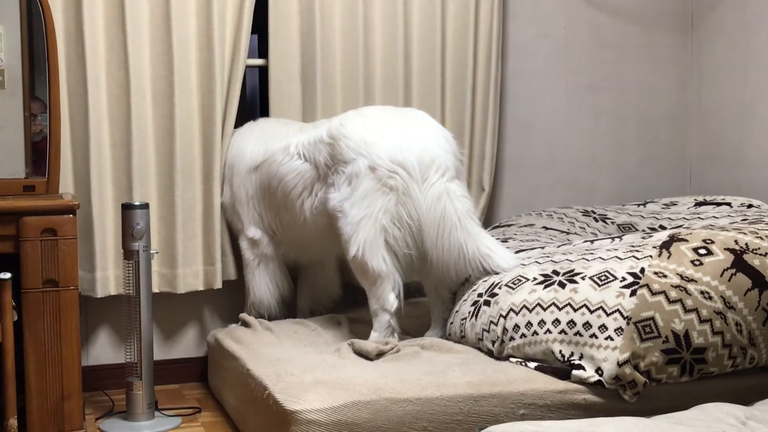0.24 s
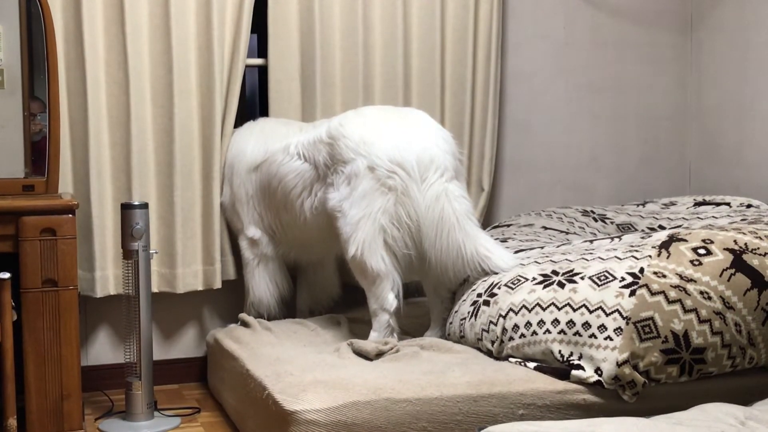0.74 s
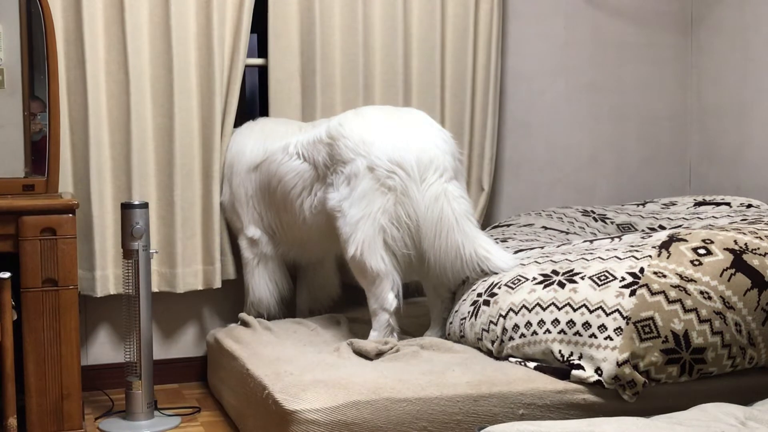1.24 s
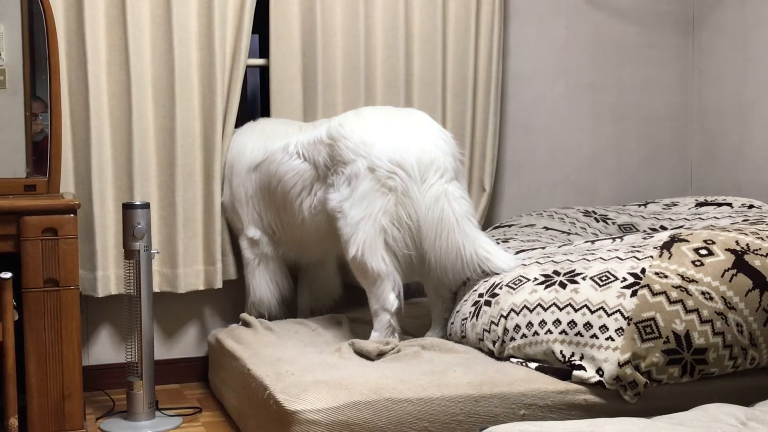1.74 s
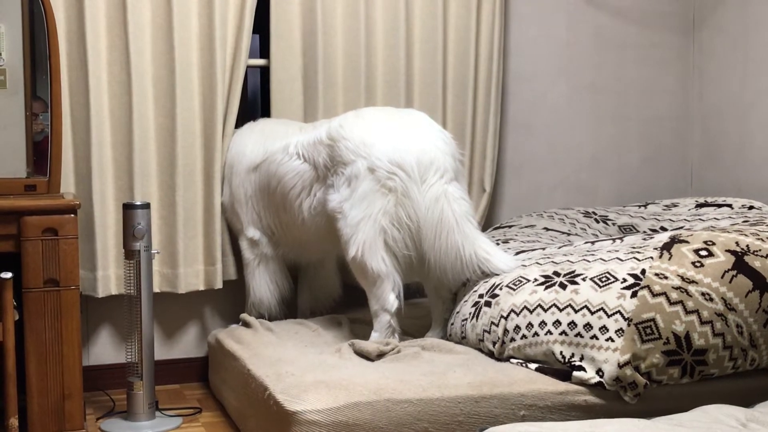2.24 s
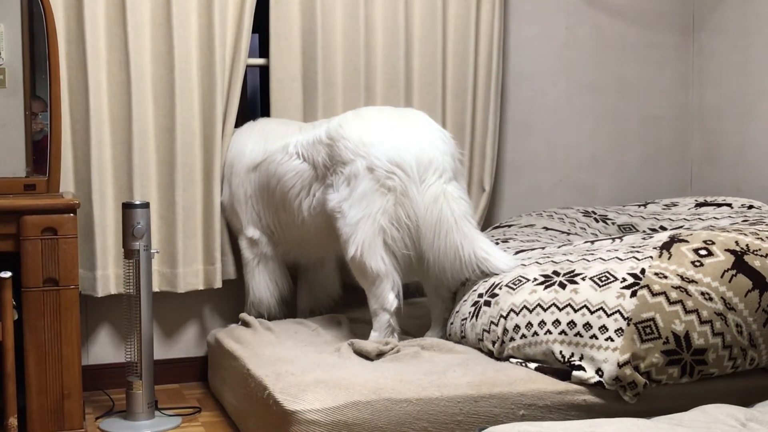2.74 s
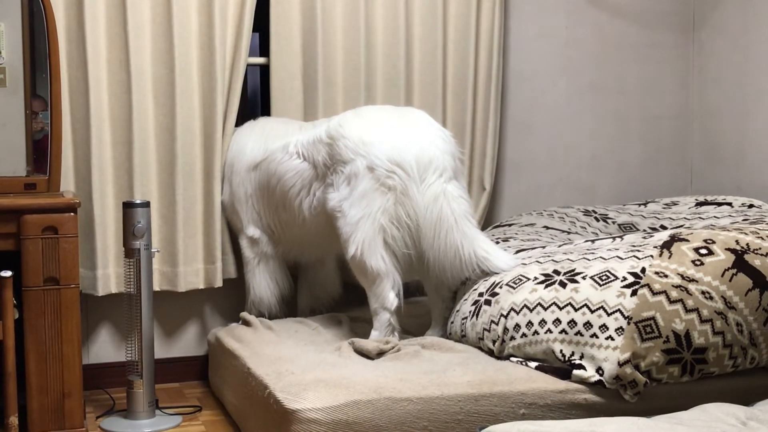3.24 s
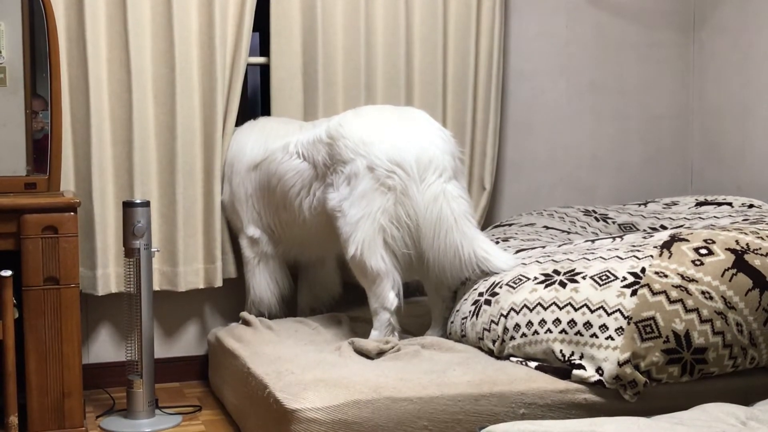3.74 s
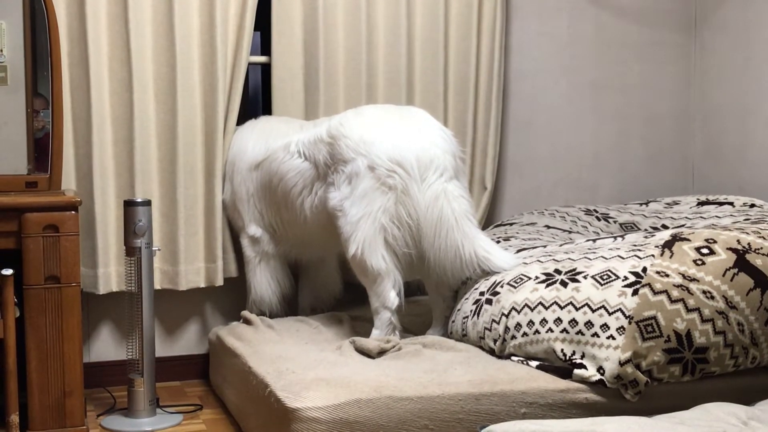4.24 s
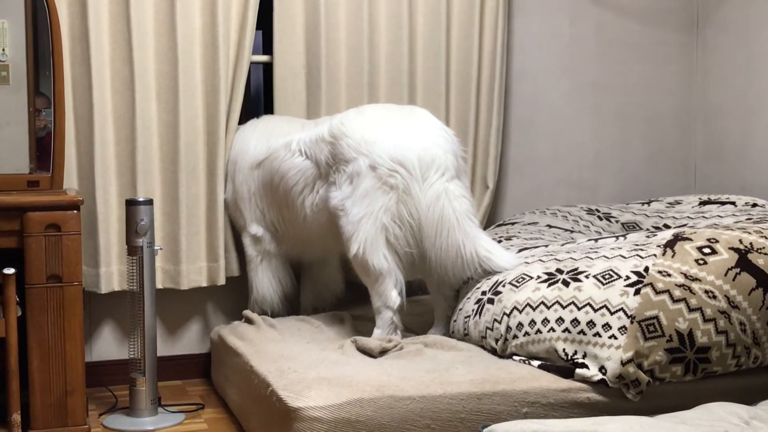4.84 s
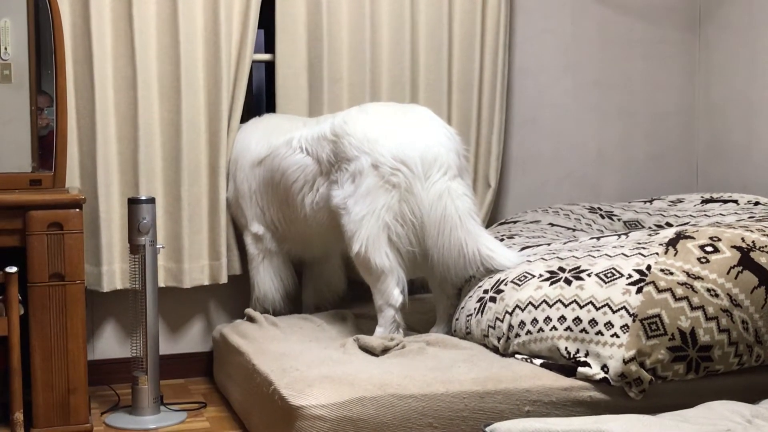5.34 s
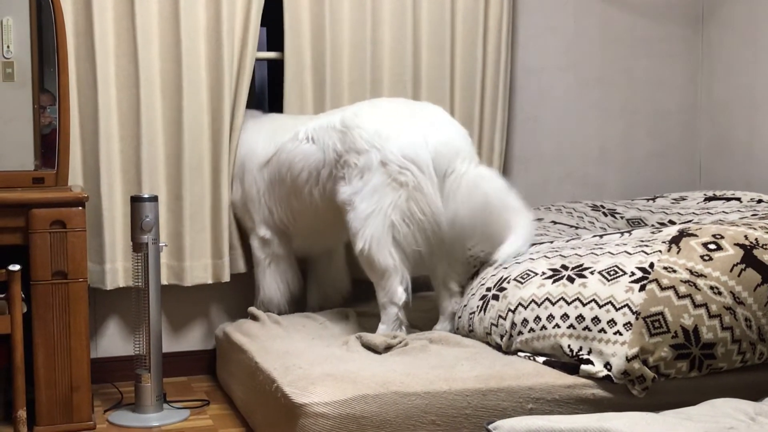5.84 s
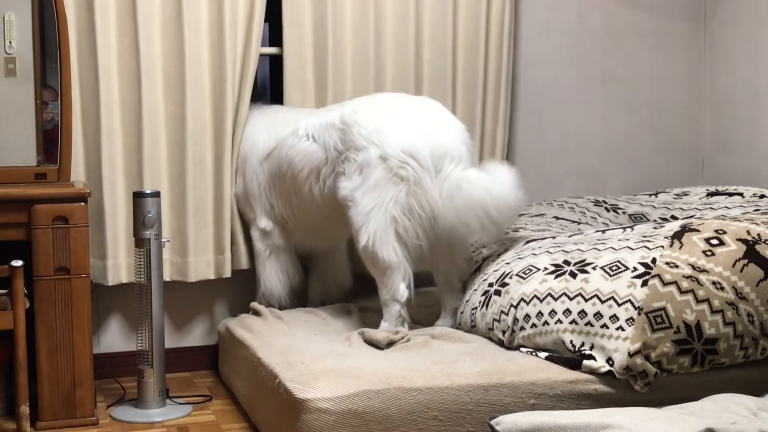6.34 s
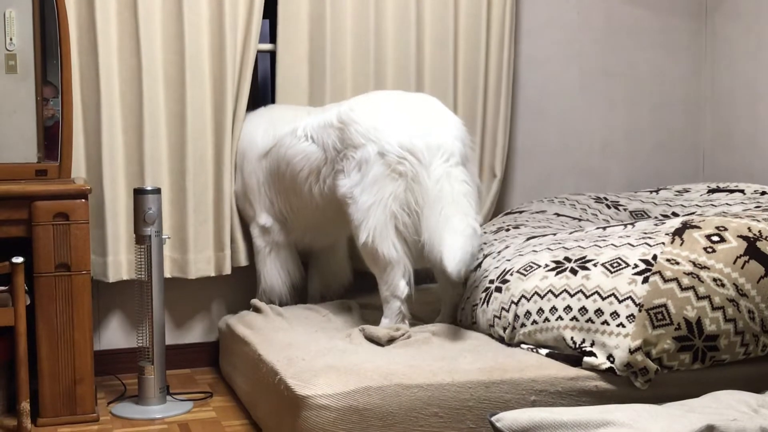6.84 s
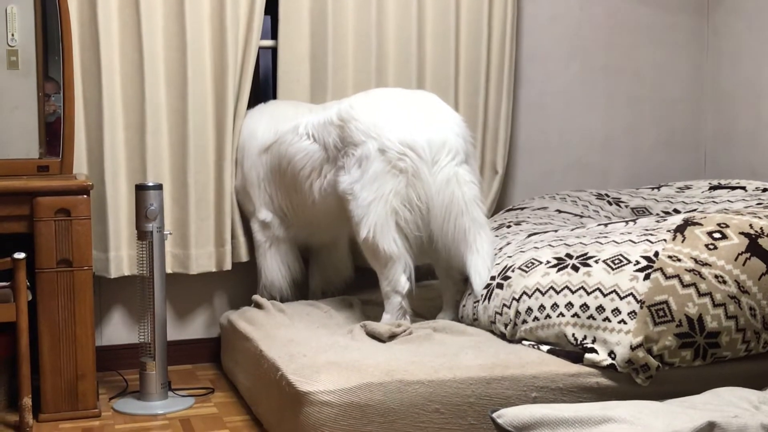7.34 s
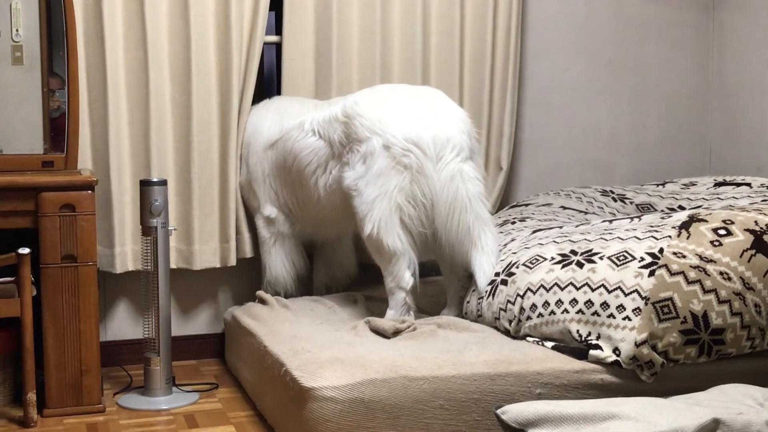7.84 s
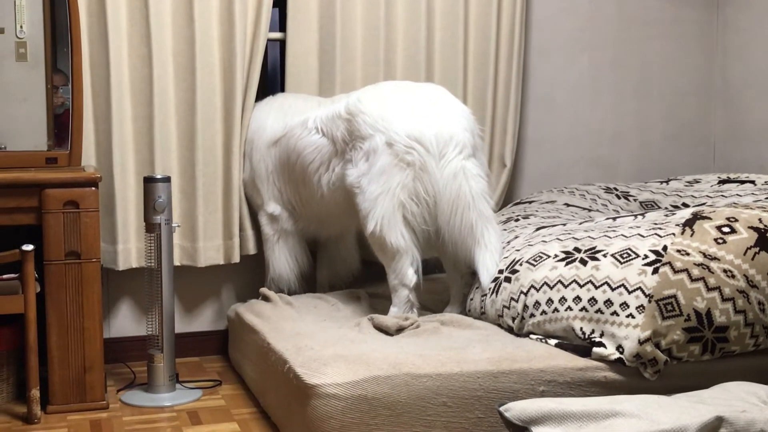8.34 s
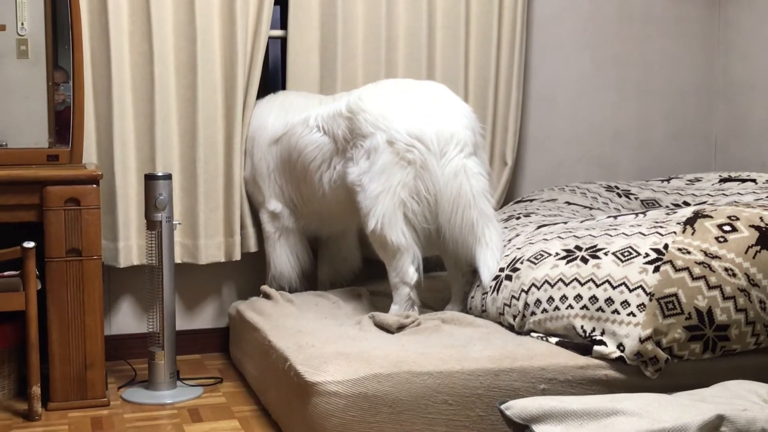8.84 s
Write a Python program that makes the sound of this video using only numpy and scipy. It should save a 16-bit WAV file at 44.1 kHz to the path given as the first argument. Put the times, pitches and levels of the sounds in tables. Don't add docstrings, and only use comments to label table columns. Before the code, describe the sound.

A big dog growls low in a bedroom and gives two loud deep barks while a second dog answers faintly from elsewhere in the house.

```python
import sys
import numpy as np
from scipy import signal
from scipy.fft import rfft, irfft, next_fast_len
from scipy.io import wavfile
from scipy.ndimage import uniform_filter1d, map_coordinates

SR = 44100
rng = np.random.default_rng(int(sys.argv[2]) if len(sys.argv) > 2 else 0)


def to_wav(s):
    ch = np.atleast_2d(s).T
    pcm = np.round(np.clip(ch, -1, 1) * 32767)
    wavfile.write(sys.argv[1], SR, pcm.astype(np.int16))


def decibels_to_gain(level_db):
    exponent = np.asarray(level_db, float) / 20
    return 10 ** exponent


N = 400869


def unit(x):
    return x / np.sqrt(np.mean(x ** 2) + 1e-20)


def steady(x):
    return x / np.sqrt(np.abs(uniform_filter1d(x ** 2, size=900)) + 1e-12)


def along(points, hz):
    f, v = np.transpose(points)
    return np.interp(np.log(hz + 1), np.log(f + 1), v)


def curves(rows):
    s, *cols = np.transpose(rows)
    return [np.interp(np.arange(N) / SR, s, c) for c in cols]


def wobble(rate):
    knots = rng.standard_normal(int(N * rate / SR) + 4)
    return map_coordinates(knots, [np.arange(N) * rate / SR])


def filtered(x, response):
    m = next_fast_len(N + SR // 2)
    return irfft(rfft(x, m) * response(np.fft.rfftfreq(m, 1 / SR)), m)[:N]


def noise(spectrum):
    return unit(filtered(rng.standard_normal(N), lambda hz: decibels_to_gain(along(spectrum, hz))))


def resonances(modes, f, order=2):
    return sum(decibels_to_gain(db) * (1j * f * w / (c * c - f * f + 1j * f * w)) ** order for c, w, db in modes)


# frequency in Hz, time to fall by 60 dB in seconds.
REVERB_TIME = [(100, 0.38), (400, 0.36), (1200, 0.26), (4000, 0.037), (12000, 0.092)]


def room(x, longer):
    hz, t, z = signal.stft(rng.standard_normal(SR // 2), SR, nperseg=256)
    t60 = longer * along(REVERB_TIME, hz)[:, None]
    tail = signal.istft(z * decibels_to_gain(-60 * t / t60), SR, nperseg=256)[1]
    return signal.fftconvolve(x, tail / np.linalg.norm(tail[:SR // 8]))[:N]


# start in seconds, length in seconds, level in dB.
RUMBLE_SWELLS = [(0, .1, -59), (.45, .5, -66), (1.29, .68, -54.5), (2.202, .35, -54), (5.14, .15, -57.5),
                 (5.62, .3, -60), (6.358, .1, -53), (7.007, .65, -58), (8.548, .6, -51)]
# frequency in Hz, density in dB per Hz.
RUMBLE_COLOUR = [(15, -30), (28, -13), (42, -3.5), (55, -6), (80, -33)]
SWELL_EDGE_DB_PER_S, STILL_DB = 116, -67.5


def rumble():
    t = np.arange(N) / SR
    swells = []
    for s, length, db in RUMBLE_SWELLS:
        outside = np.maximum(np.maximum(s - t, t - s - length), 0)
        swells.append(db - SWELL_EDGE_DB_PER_S * outside)
    level_db = np.max(swells, axis=0).clip(STILL_DB)
    return decibels_to_gain(level_db + 1.0) * noise(RUMBLE_COLOUR)


# frequency in Hz, density in dB per Hz.
HISS_COLOUR = [(760, -33), (1300, -10.5), (1800, -0.5), (2020, -3), (2970, -3.5), (3470, -6), (4060, -4.5),
               (4910, -7.5), (6860, -2.5), (7690, -6), (8810, -2), (10400, -8.5), (11400, -6), (14700, -10),
               (15800, -13)]


def hiss():
    return decibels_to_gain(5.0 + 0.59 * wobble(9)) * noise(HISS_COLOUR)


# frequency in Hz, density in dB per Hz.
FAN_AIR = [(26, -42), (45, 1.5), (64, -4.5), (150, -6), (176, -1.5), (236, -7.5), (270, -12), (367, -10.5),
           (478, -19), (641, -12), (846, -15), (980, -12), (1500, -16.5), (1950, -13), (3300, -120)]
# frequency in Hz, level in dB.
FAN_HUM = [(120, -62), (182, -61.5), (238, -61)]


def fan():
    t = np.arange(N) / SR
    out = decibels_to_gain(-0.5 + 0.2 * wobble(0.97)) * noise(FAN_AIR)
    for hz, db in FAN_HUM:
        level = decibels_to_gain(db + 51 + 2.4 * wobble(8.0))
        out = out + level * np.sin(2 * np.pi * hz * t + 2.3 * wobble(7.3))
    return out


# frequency in Hz, density in dB per Hz.
BEDDING_COLOUR = [(500, -42), (900, 5), (1150, 10), (1800, -12), (2500, -3), (3500, -35), (6000, -89)]


def bedding():
    return decibels_to_gain(-14 + 4.5 * wobble(4) + 2.5 * wobble(21)) * noise(BEDDING_COLOUR)


# start in seconds, sink, hold and recovery times in seconds, depth in dB.
GAIN_DUCKS = [
    (5.617, 0.097, 0.53, 0.066, -3),
    (6.62, 0.088, 0.022, 0.199, -1.5),
]
HISS_DB = -51.5


def background():
    t = np.arange(N) / SR
    level_db = HISS_DB
    for s, sink, hold, back, db in GAIN_DUCKS:
        level_db = level_db + np.interp(t, s + np.cumsum([0, sink, hold, back]), [0, db, db, 0])
    return decibels_to_gain(level_db) * (hiss() + fan() + bedding()) + rumble()


# time in seconds, length in seconds, centre in Hz,
# width in Hz, level in dB.
SOFT_MOVES = [(0.446, 0.2, 1130, 400, -56), (1.9, 0.11, 350, 300, -59), (7.424, 0.035, 2000, 1800, -45),
              (8.98, 0.09, 420, 300, -50.5), (1, 0.074, 1500, 1396, -53.5), (1.81, 0.08, 126, 50, -41.5),
              (1.814, 0.047, 790, 700, -51), (2.42, 0.17, 1500, 1580, -49.5), (5.045, 0.12, 119.2, 60, -48),
              (5.195, 0.058, 2100, 1000, -44), (6.916, 0.12, 1500, 1411, -51),
              (7.303, 0.0793, 197.2, 150.4, -53), (7.492, 0.058, 410, 150, -50.5),
              (7.57, 0.067, 490, 250, -47.5), (7.776, 0.1, 433, 244, -50), (8.23, .05, 1770, 700, -48),
              (8.32, .03, 2000, 1200, -48), (8.524, 0.039, 130.1, 149.7, -43),
              (8.788, 0.057, 2440, 802, -44), (8.857, 0.027, 201, 80, -36.5)]


def stirs():
    out, t = np.zeros(N), np.arange(N) / SR
    for s, length, hz, width, db in SOFT_MOVES:
        side = length * np.where(t < s, .5, 1.5)
        swell = np.exp(-(2 * (t - s) / side) ** 2) * decibels_to_gain(db)
        low = [(max(hz - 2 * width, 9), -40), (max(hz - width / 2, 30), 0)]
        high = [(hz + width / 2, 0), (hz + 2 * width, -30), (hz + 5 * width, -90)]
        out += swell * noise(low + high)
    return out


# time in seconds, peak in dB, crack over the peak in dB.
BLOWS = [(6.998, -17.5, -36), (7.003, -21.5, 1.5), (7.082, -25.5, -13), (7.092, -29, -6), (7.13, -28.5, -8),
         (7.161, -47, -8), (7.282, -34.5, 3.5), (7.366, -24.5, -1.5), (7.371, -28.5, -14), (7.38, -27, -25)]
# frequency in Hz, width in Hz, level in dB.
WOOD_RING = [(300, 170, -5), (570, 27, -10), (775, 130, -13), (874, 160, 5.5), (1040, 41, 6),
             (1070, 50, -12), (1500, 580, -25)]
# frequency in Hz, width in Hz, level in dB.
CRACK_RING = [(1500, 410, 11.5), (2520, 1050, 10), (3430, 2400, -2), (5200, 1800, -7), (7240, 2300, -22)]
# time in seconds, frequency in Hz, level in dB, time to fall by 60 dB in seconds.
BOARD_THUDS = [
    (7.013, 87, -26.5, 0.23),
    (7.115, 72.4, -27.5, 0.15),
    (7.381, 97.7, -20, 0.15),
]


def knocks():
    blows, cracks, boards = np.zeros(N + SR), np.zeros(N + SR), np.zeros(N + SR)
    t = np.arange(SR // 3) / SR
    for s, db, crack_db in BLOWS:
        here = slice(round(s * SR), round(s * SR) + len(t))
        blows[here] += rng.standard_normal(len(t)) * decibels_to_gain(db + 18.5 - 60 * t / 0.016)
        cracks[here] += rng.standard_normal(len(t)) * decibels_to_gain(db + crack_db - 2.5 - 60 * t / 0.056)
    for s, hz, db, t60 in BOARD_THUDS:
        late_start = 1 - np.exp(-t / 0.011)
        boards[round(s * SR):][:len(t)] += decibels_to_gain(db - 60 * t / t60) * np.sin(2 * np.pi * hz * t) * late_start
    wood = filtered(blows[:N], lambda f: resonances(WOOD_RING, f, order=1) / (1 + 1j * f / 1500) ** 3)
    hits = wood + filtered(cracks[:N], lambda f: resonances(CRACK_RING, f))
    return hits + boards[:N] + decibels_to_gain(-7.0) * room(hits, longer=0.72)


def sounding(calls):
    t = np.arange(N) / SR
    gates = [np.clip(np.minimum(t - c[0][0], c[-1][0] - t) / .012 + 1, 0, 1) for c in calls]
    return np.clip(sum(gates), 0, 1)


def breath(modes):
    air = rng.standard_normal(N)
    return steady(filtered(air, lambda f: resonances(modes, f) / (1 + 1j * f / 7000) ** 2))


def voice(calls, throat, jitter, scatter, airy, roll_db, hoarse_db, front_db):
    pitch, *levels = curves(np.vstack(calls))
    levels = uniform_filter1d(levels, size=800, axis=1)
    first_db, second_db, rough_db, boom_db, bright_db = levels
    turns = np.cumsum(pitch * (1 + jitter * wobble(60))) / SR
    clean = decibels_to_gain(first_db) * np.sin(2 * np.pi * turns)
    all_modes = sum(throat, [])
    for k in range(2, 8):
        lift = 1
        if k > 2:
            lift = np.repeat(np.abs(resonances(all_modes, k * pitch[::64])) + 0.11, 64)[:N]
        level = decibels_to_gain(second_db + roll_db * (k - 2.5) + 0.29 * wobble(40))
        clean = clean + lift * level * np.sin(2 * np.pi * k * turns + k)
    loose = turns / 2 + scatter * wobble(150)
    pulses = np.diff(np.floor(loose), prepend=0) * decibels_to_gain(5.8 * wobble(200))
    air = rng.standard_normal(N) * (4.2 + np.cos(2 * np.pi * loose))
    drive = unit(pulses / np.sqrt(pitch)) + airy * unit(air)

    def through(modes):
        return steady(filtered(drive, lambda f: resonances(modes, f) / (1 + 1j * f / 1700) ** 4))

    boom, mid, high = [through(modes) for modes in throat]
    hoarse = decibels_to_gain(rough_db + hoarse_db) * (decibels_to_gain(boom_db) * boom + mid) + decibels_to_gain(bright_db + front_db) * high
    return sounding(calls) * np.sqrt(2) * clean, sounding(calls) * hoarse


# start of full voice in seconds, time to the peak in seconds, pitch in Hz,
# level in dB, fundamental over it in dB.
FAR_BARKS = [
    (.666, 0.043, 343.7, -30, 0.5),
    (1.354, 0.065, 318.5, -28.5, -7),
    (2.671, 0.06, 330.3, -28.5, -9),
    (6.615, 0.0442, 354, -29, 11),
    (8.557, 0.051, 336.1, -28.5, -1),
]
COLD_START = (.45, .75)
COLD_DB = 72
SWELL_S, BODY_S, DIE_S = .05, 0.137, 0.1285
QUIET_DB, LEAD_DB, HOLD_DB = -34, -12, -9.5
SCOOP, SAG = 1.03, .05
THIN_DB_PER_S = 81
HUSK_DB, HUSK_LEAD_DB, FAR_BOOM_DB, FAR_FRONT_DB, FAR_JAWS_DB = -2.5, 7.5, 0.5, -7.5, -14
HUSK_SLOPE, OPEN_DB = 0.18, 3


def answers():
    shape = np.array([QUIET_DB, LEAD_DB, 0, HOLD_DB, QUIET_DB])
    opening = OPEN_DB * np.array([-1, -1, 1, 0, -1])
    calls = []
    for s, peak, hz, db, first_db in FAR_BARKS:
        t = np.array([-SWELL_S, 0, peak, BODY_S, BODY_S + DIE_S])
        husk = db + shape + HUSK_DB - HUSK_SLOPE * max(first_db, 0)
        husk = husk + HUSK_LEAD_DB * np.array([0, 1, 0, 1, 0])
        first = db + first_db + shape - THIN_DB_PER_S * np.clip(t - peak, 0, BODY_S)
        onset = (SCOOP, 1 + SAG) if calls else COLD_START
        bend = np.array([*onset, 1 - SAG / 2, 1, 1 - SAG])
        second = db + shape - COLD_DB * np.maximum(1 - SAG - bend, 0)
        front = husk + FAR_FRONT_DB + opening
        jaw = husk + FAR_JAWS_DB + 0.9 * opening
        calls.append(np.transpose([s + t, hz * bend, first, second, husk, FAR_BOOM_DB + 0 * t, front, jaw]))
    return calls


# frequency in Hz, width in Hz, level in dB.
FAR_THROAT = [
    [(341, 194, -8.5), (389, 40, -0.5)],
    [(520, 88, -17), (634, 32, -10), (671.7, 60, 4.5)],
    [(1037, 87, -8.5), (1152, 36, 1.5), (1194, 49, -6), (1410, 200, -15)],
]
# frequency in Hz, width in Hz, level in dB.
FAR_JAWS = [(1830, 150, -1), (1960, 170, 0)]


def far_dog():
    calls = answers()
    clean, hoarse = voice([c[:, :-1] for c in calls], FAR_THROAT, jitter=.008, scatter=.1, airy=.4,
                          roll_db=-5.5, hoarse_db=0, front_db=0)
    jaws_db = curves(np.vstack(calls))[-1]
    hoarse = hoarse + sounding(calls) * decibels_to_gain(jaws_db + 3.0) * breath(FAR_JAWS)
    echo = room(decibels_to_gain(-29) * clean + decibels_to_gain(-7.5) * hoarse, longer=0.74)
    return decibels_to_gain(-1.5) * clean + decibels_to_gain(-6.5) * hoarse + echo


# time in seconds, pitch in Hz, level in dB.
GROWLS = [
    [(2.45, 50.7, -56), (2.54, 54.5, -54), (2.646, 61.0, -48), (2.95, 59.1, -50), (3.118, 63.8, -47.5),
     (3.38, 64.9, -47.5), (3.644, 64.6, -49), (3.852, 67.2, -54.5), (3.95, 65.6, -63)],
    [(6.3, 78.67, -48), (6.394, 71.2, -46), (6.654, 68.8, -41), (6.718, 71.1, -44), (6.78, 61.3, -53)],
]
# frequency in Hz, level in dB.
CHEST = [(150, -9), (188, -6), (215, -18), (255, -23), (290, -5.5), (340, -22.5), (420, -27), (600, -48)]
GROWL_FIRST_DB, GROWL_STEADY, GROWL_MID_DB = -4.5, 0.18, -50


def growl():
    pitch, second_db = curves(np.vstack(GROWLS))
    first_db = second_db + GROWL_FIRST_DB - GROWL_STEADY * (second_db - GROWL_MID_DB)
    turns = np.cumsum(pitch * (1 + 0.01 * wobble(30))) / SR
    upper = 0
    for k in range(2, 8):
        level_db = along(CHEST, k * pitch) * (k > 2) + 1.9 * wobble(7.7)
        upper = upper + decibels_to_gain(level_db) * np.sin(2 * np.pi * k * turns + k)
    tone = decibels_to_gain(first_db) * np.sin(2 * np.pi * turns) + decibels_to_gain(second_db) * upper
    return sounding(GROWLS) * np.sqrt(2) * tone


# time in seconds, pitch in Hz, voiced level in dB,
# hoarse level in dB, mouth opening in dB.
BARK_TOPS = [
    [(5.495, 134.4, -65, -76, 0), (5.534, 288.2, -20.5, -19, -21), (5.565, 343.5, -15.5, -7.5, -10),
     (5.59, 378.6, -16.5, -19.5, -8), (5.62, 410.5, -5, -10, -0.5), (5.652, 416.9, -26.5, -9.5, -4),
     (5.678, 415.7, -20, -15.5, -2)],
    [(5.866, 134, -45, -43, 5), (5.9, 267.1, -24.5, -24, -5), (5.936, 410, -14.5, -9, -3.5),
     (5.972, 411, -6.5, -49, -9), (6.002, 411.7, -18.5, -7.5, -5.5), (6.055, 394.4, -22, -13, -2.5)],
]
# start in seconds, length in seconds,
# rest pitch in Hz, slide time in seconds, level in dB.
BARK_SLIDES = [
    (5.691, .168, 97.5, .066, -33.5),
    (6.064, .235, 74.2, .062, -38),
]
TOP_HZ, SECOND_DB, BOOM_DB, BOOM_DB_PER_OCTAVE = 410, -17, -9, -18.5
BREAK_HZ, SLIDE_SECOND_DB = 217, -3.5
CATCH_S, CATCH_DB, FADE_DB_PER_S = 0.023, -18, 40
RASP_DB, RASP_DB_PER_S, RASP_FLOOR_DB = 10, 193, -18
RASP_BOOM_DB, RASP_FRONT_DB, RASP_COLOUR_S = 17, 7.5, 0.087


def barks():
    calls = []
    for top, (start, length, rest_hz, slide, db) in zip(BARK_TOPS, BARK_SLIDES):
        s, hz, voiced, rough, mouth = np.transpose(top)
        boom = BOOM_DB + BOOM_DB_PER_OCTAVE * np.log2(hz / TOP_HZ)
        calls.append(np.transpose([s, hz, voiced, voiced + SECOND_DB, rough, boom, rough + mouth]))
        t = np.linspace(0, length, num=24)
        pitch = rest_hz + (BREAK_HZ - rest_hz) * np.exp(-t / slide)
        tone = db - FADE_DB_PER_S * t
        first = tone + CATCH_DB * np.clip(1 - t / CATCH_S, 0, 1)
        rasp = np.clip(1 - (t / RASP_COLOUR_S) ** 2, 0, 1)
        rough = db + np.maximum(RASP_DB - RASP_DB_PER_S * t, RASP_FLOOR_DB)
        calls.append(np.transpose([start + t, pitch, first, tone + SLIDE_SECOND_DB,
                                   rough, RASP_BOOM_DB * rasp, rough + RASP_FRONT_DB * rasp]))
    return calls


# start in seconds, length in seconds, wide mouth in dB, teeth in dB.
JAW_OPENINGS = [
    (5.496, 0.29, -31.5, -41),
    (5.829, 0.304, -52, -44.5),
]
GAPE_S, TEETH_S, CLOSE_S = .055, .11, 0.052
SHUT_DB, WIDE_DB_PER_S, TEETH_DB_PER_S = -81, 147, 50


def gapes():
    calls = []
    for s, length, wide, teeth in JAW_OPENINGS:
        waning = length - CLOSE_S - TEETH_S
        calls.append([
            (s, SHUT_DB, SHUT_DB),
            (s + GAPE_S, wide, (teeth + SHUT_DB) / 2),
            (s + TEETH_S, wide - 3, teeth),
            (s + length - CLOSE_S, wide - WIDE_DB_PER_S * waning, teeth - TEETH_DB_PER_S * waning),
            (s + length, SHUT_DB, SHUT_DB)])
    return calls


# frequency in Hz, width in Hz, level in dB.
WIDE_MOUTH = [(1480, 350, 0), (1850, 500, -12)]
# frequency in Hz, width in Hz, level in dB.
TEETH = [(2020, 300, 0), (2350, 450, 1), (4180, 380, 5), (4620, 330, 1), (5380, 400, 4.5)]


def jaws():
    calls = gapes()
    wide_db, teeth_db = curves(np.vstack(calls))
    wide = decibels_to_gain(wide_db + 5.0) * breath(WIDE_MOUTH)
    teeth = decibels_to_gain(teeth_db + 4.5 + 2.5 * wobble(20)) * breath(TEETH)
    return sounding(calls) * (wide + teeth)


# frequency in Hz, width in Hz, level in dB.
NEAR_THROAT = [
    [(371, 93, 8.5)],
    [(548, 120, 9.5), (623, 127, 11), (690, 230, -16)],
    [(981, 75, -2), (1058, 120, 3.5), (1200, 270, -18)],
]


def near_dog():
    clean, hoarse = voice(barks(), NEAR_THROAT, jitter=.006, scatter=.11, airy=.4,
                          roll_db=-5, hoarse_db=-2.5, front_db=-2)
    hoarse = hoarse + decibels_to_gain(3.0) * jaws()
    echo = room(decibels_to_gain(-13.5) * clean + decibels_to_gain(-9.0) * hoarse, longer=0.85)
    return growl() + clean + decibels_to_gain(-10.0) * hoarse + echo


def scene():
    return (background() + stirs() + knocks() + far_dog() + near_dog())[None]


def low_pass(x):
    return signal.sosfilt(signal.butter(12, 15980, fs=SR, output="sos"), x)


def record(dry):
    rounded = dry / (1 + np.abs(dry / 0.92) ** 4) ** (1 / 4)
    return low_pass(rounded)


dry = scene()
out = record(dry)
to_wav(out)
```